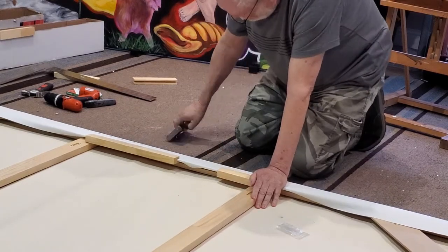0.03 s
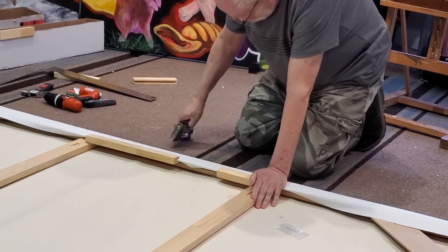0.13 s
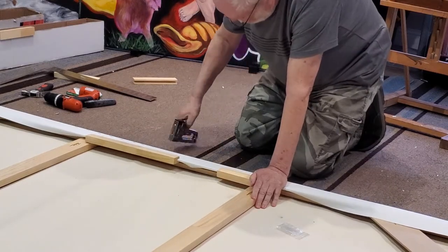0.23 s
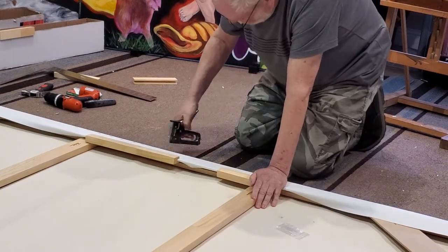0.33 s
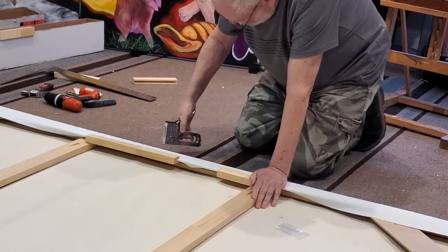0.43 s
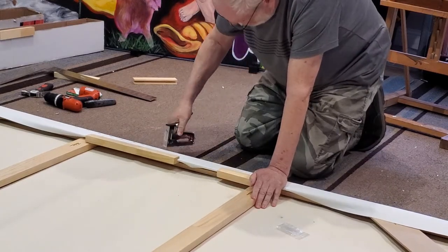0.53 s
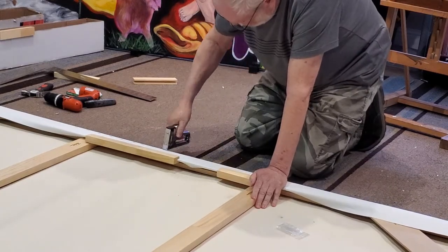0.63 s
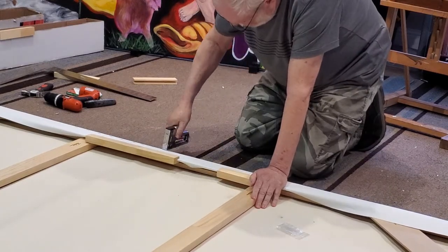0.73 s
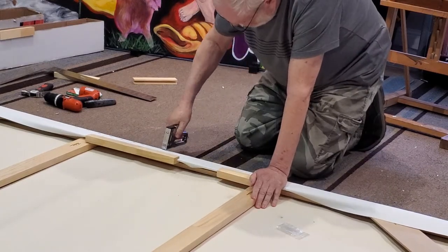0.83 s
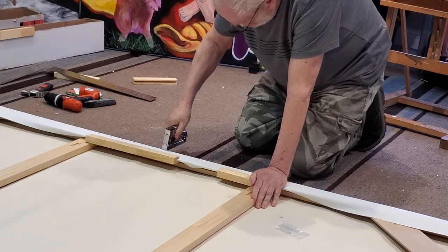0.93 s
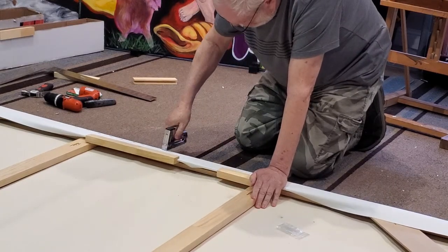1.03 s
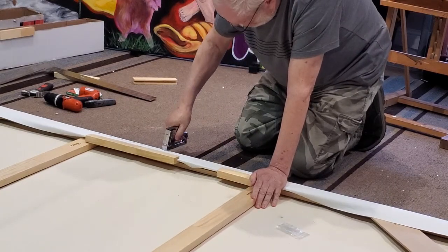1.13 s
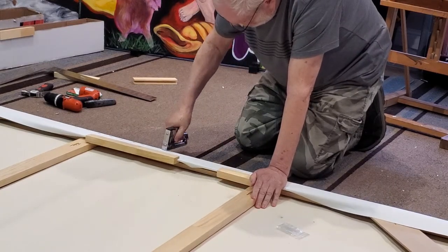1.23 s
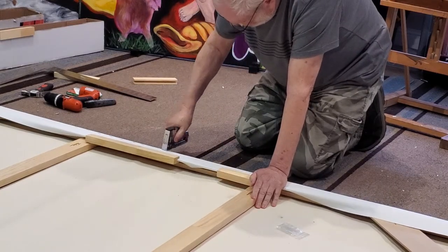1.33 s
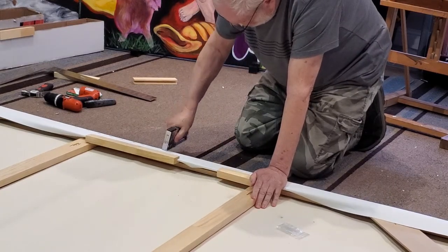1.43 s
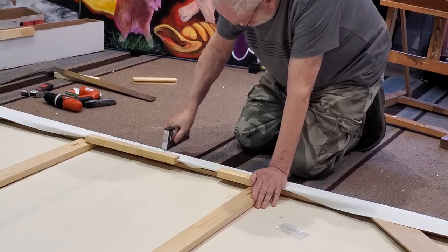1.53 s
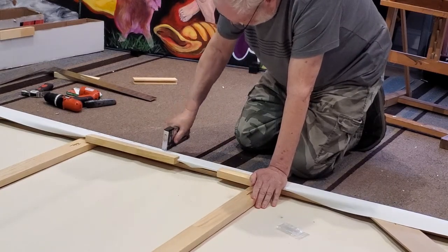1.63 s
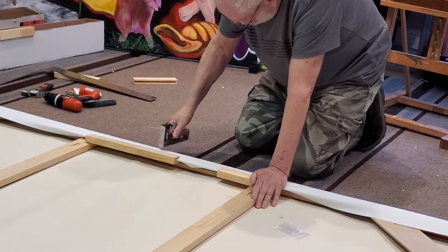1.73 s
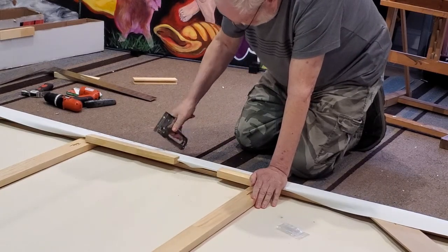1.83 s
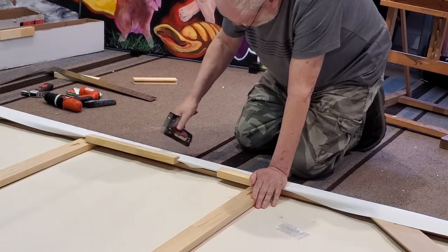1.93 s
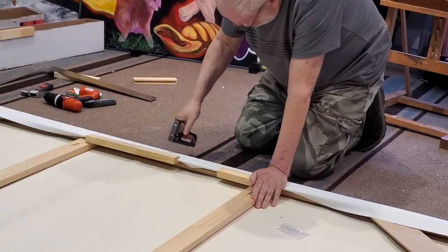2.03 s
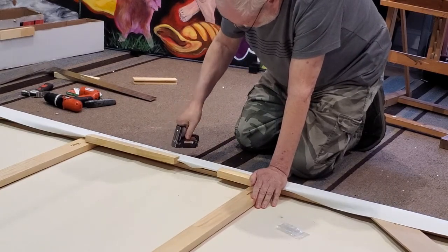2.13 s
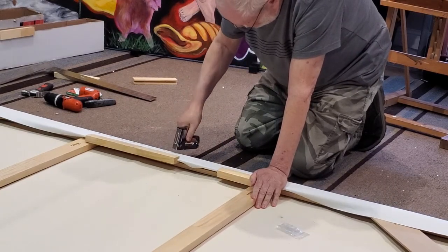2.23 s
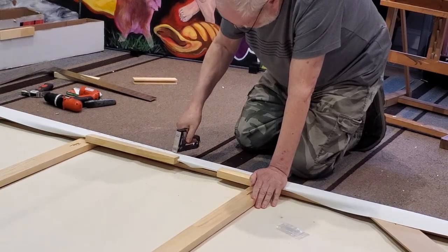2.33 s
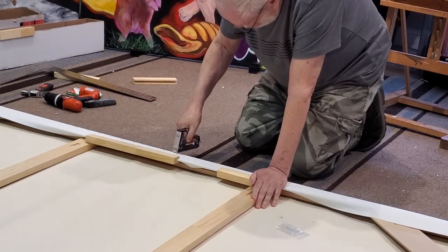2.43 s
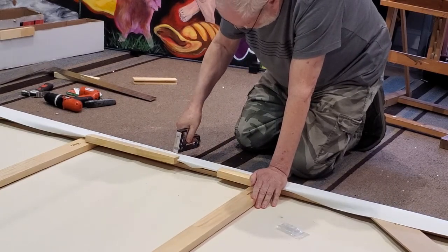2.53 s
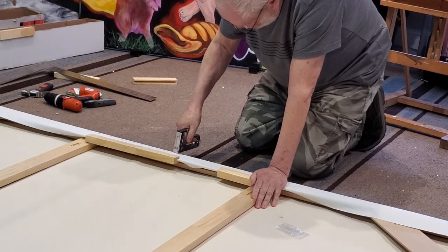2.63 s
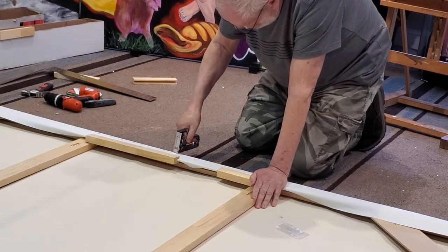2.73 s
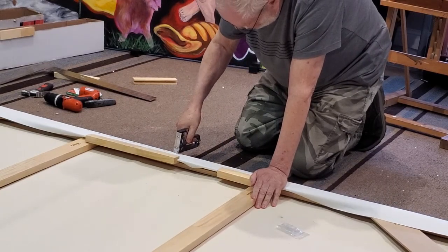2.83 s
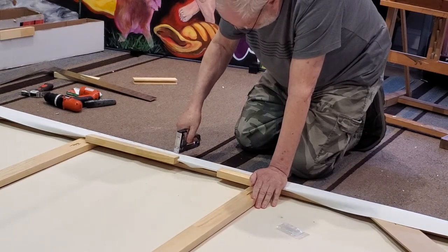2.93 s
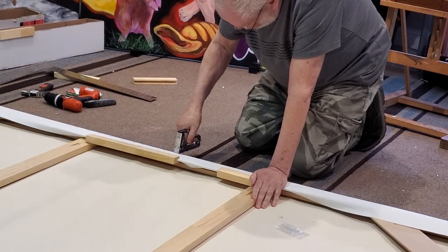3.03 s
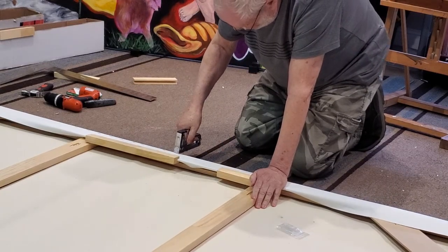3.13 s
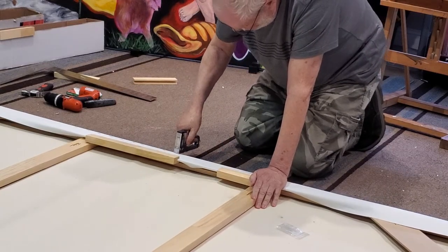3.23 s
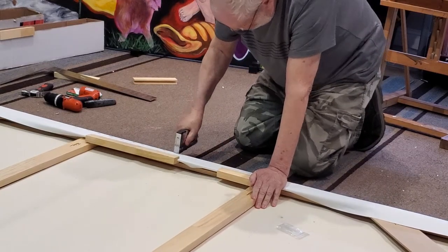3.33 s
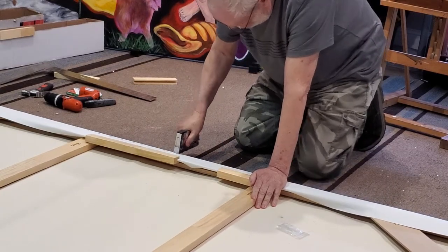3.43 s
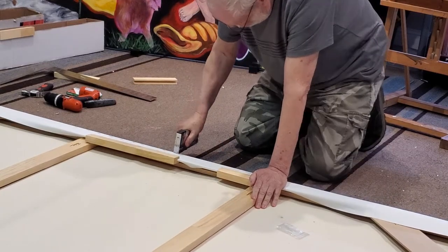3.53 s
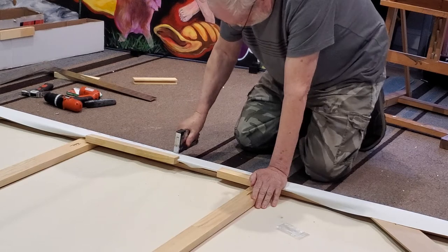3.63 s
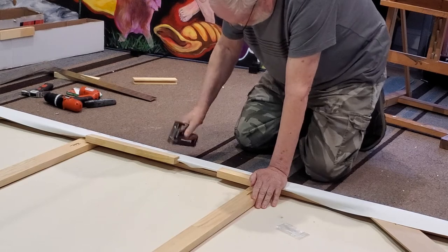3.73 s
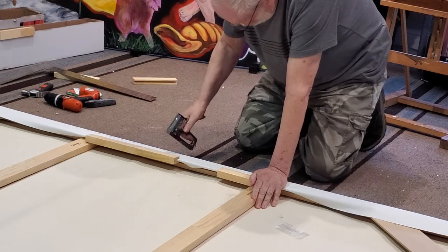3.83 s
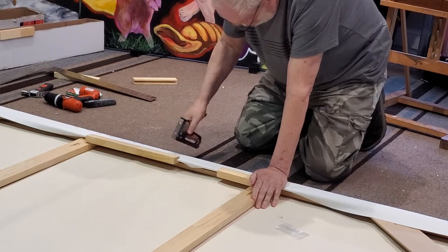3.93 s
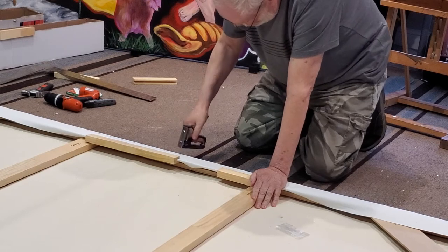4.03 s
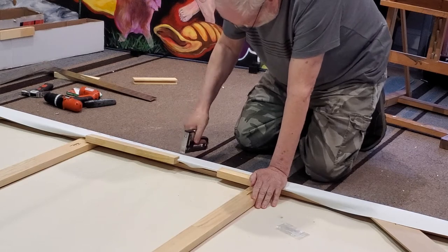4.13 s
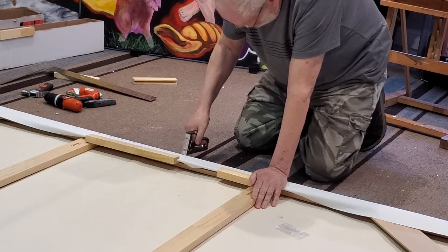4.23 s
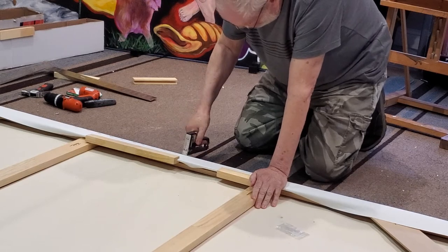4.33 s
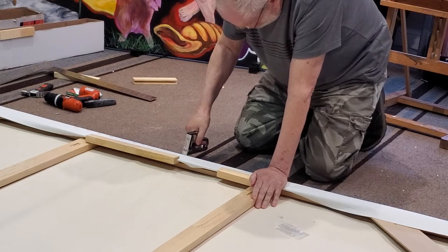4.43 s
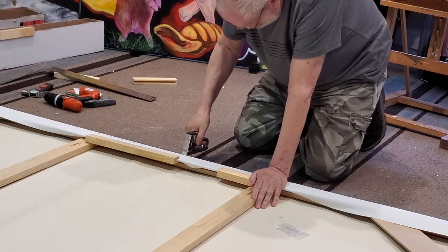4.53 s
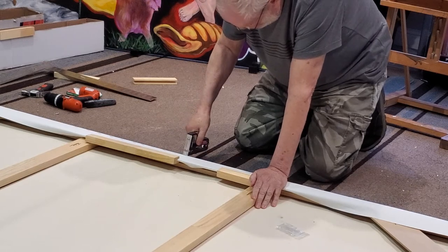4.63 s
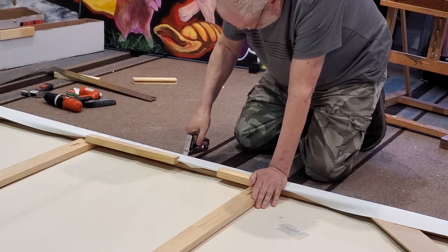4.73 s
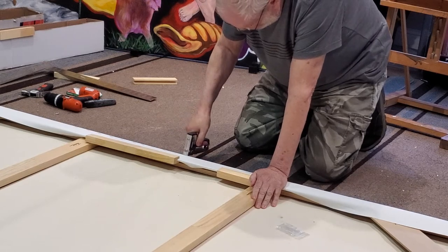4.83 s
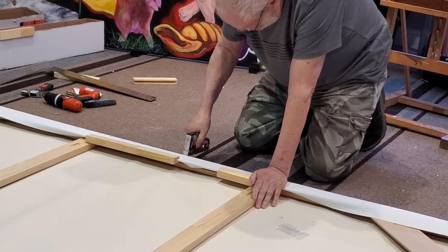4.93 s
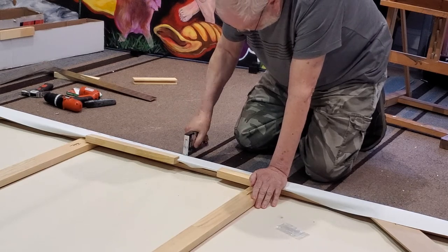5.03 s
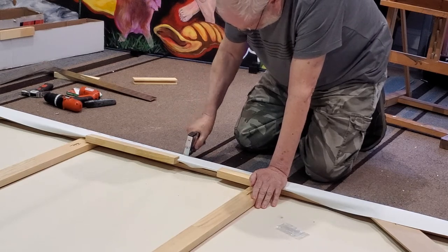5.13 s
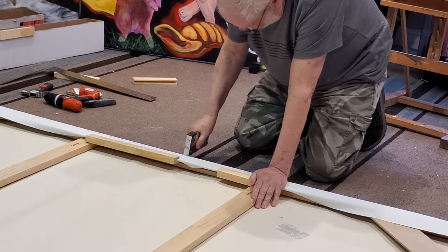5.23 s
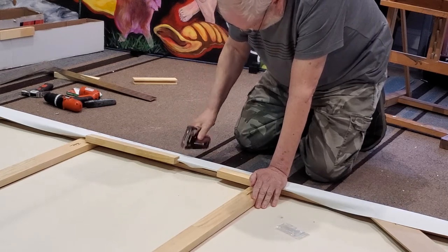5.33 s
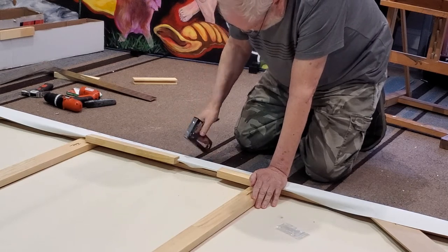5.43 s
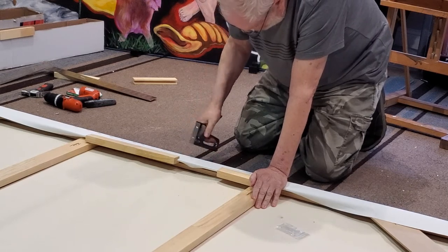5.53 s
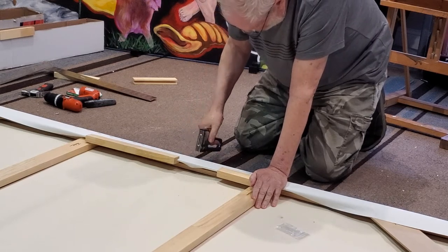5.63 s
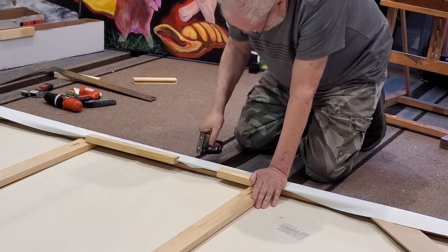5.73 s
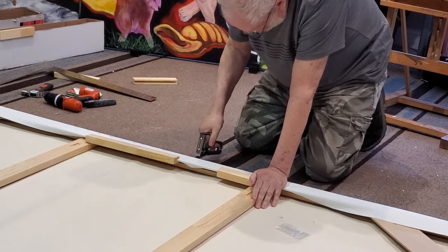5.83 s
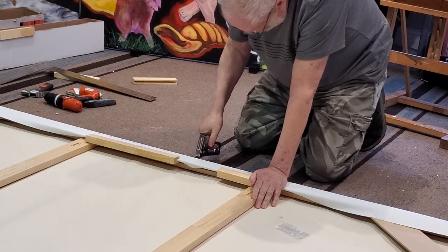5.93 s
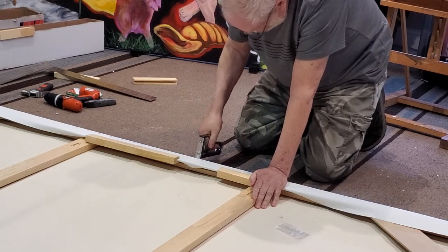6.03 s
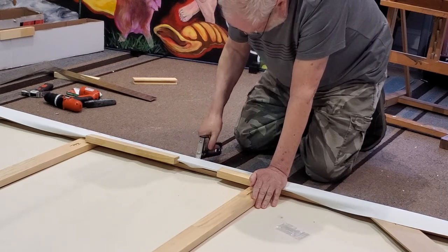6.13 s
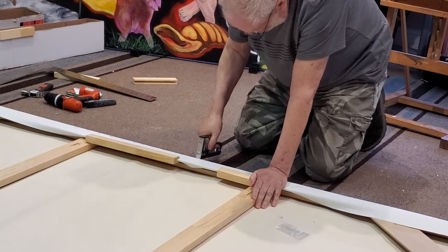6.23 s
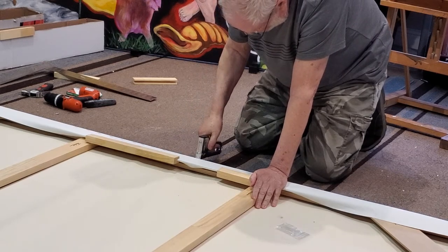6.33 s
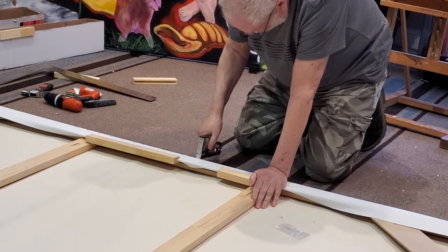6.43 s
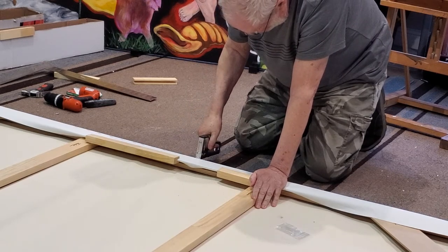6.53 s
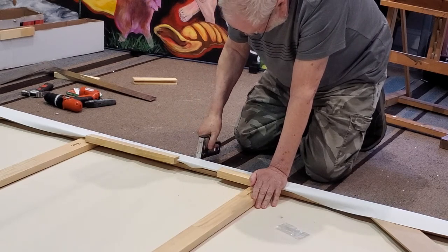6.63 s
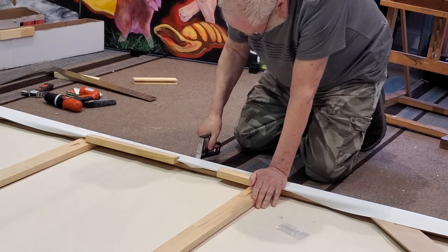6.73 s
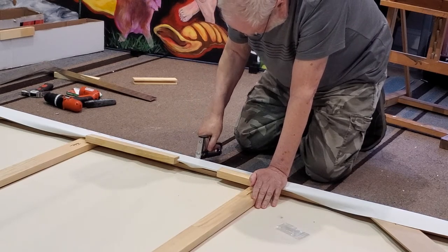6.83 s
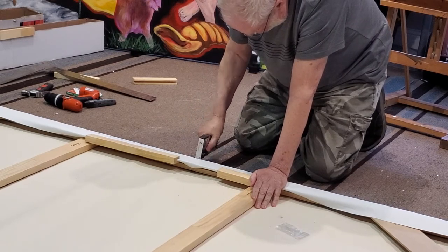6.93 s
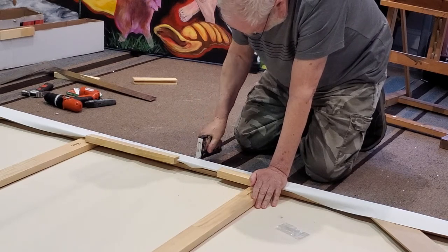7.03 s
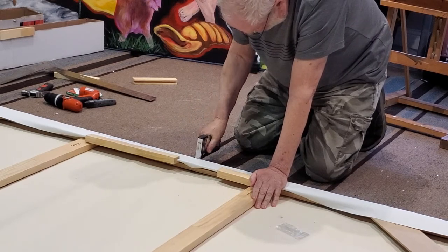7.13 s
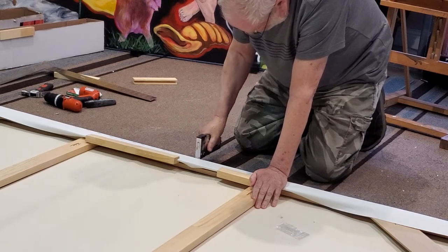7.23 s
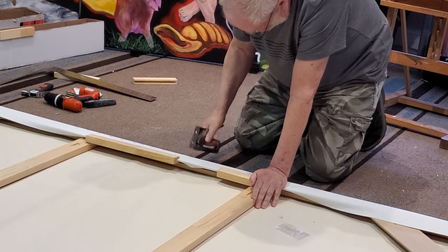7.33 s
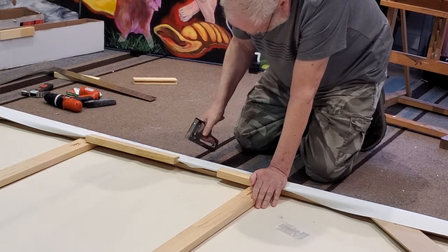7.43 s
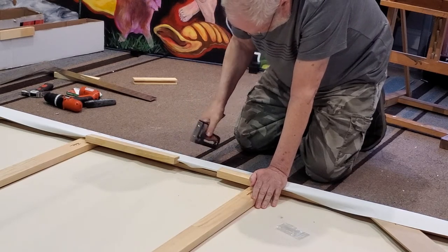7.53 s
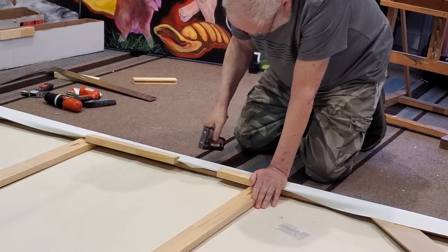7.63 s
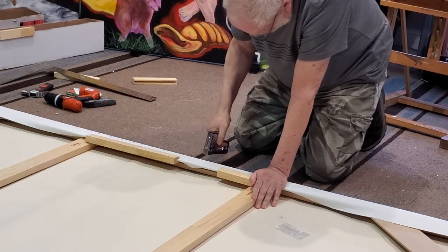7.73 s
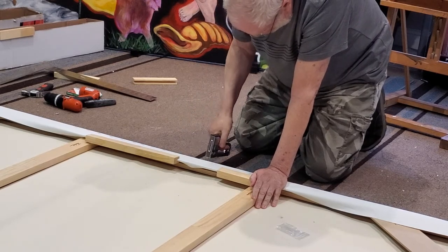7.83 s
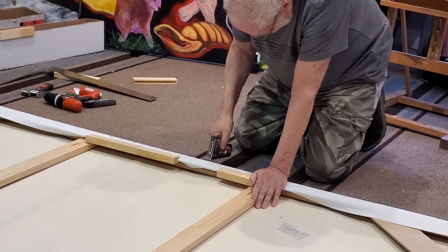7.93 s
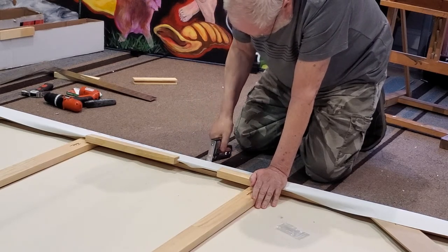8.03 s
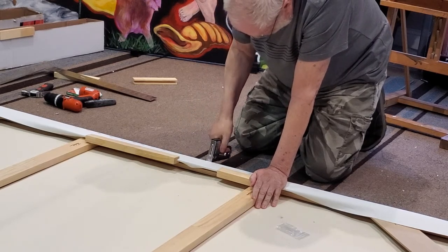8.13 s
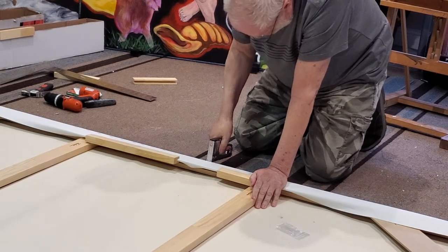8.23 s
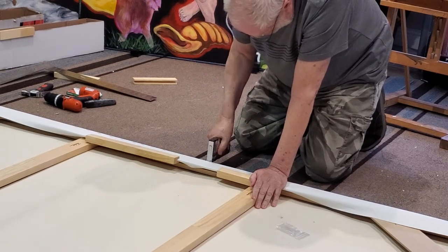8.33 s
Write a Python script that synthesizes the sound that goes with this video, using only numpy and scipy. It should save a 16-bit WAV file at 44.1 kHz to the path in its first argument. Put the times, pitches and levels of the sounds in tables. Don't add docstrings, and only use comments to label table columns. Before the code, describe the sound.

Four sharp staple-gun slams with woody thuds ring through a workshop, with creaking lever squeezes between them and a compressor humming deep behind.

```python
import sys
import numpy as np
from scipy import signal
from scipy.fft import rfft, irfft, next_fast_len
from scipy.io import wavfile
from scipy.ndimage import uniform_filter1d, map_coordinates

SR = 44100
rng = np.random.default_rng(int(sys.argv[2]) if len(sys.argv) > 2 else 0)


def natural_amplitude(level_db):
    exponent = np.asarray(level_db, float) / 20
    return 10 ** exponent


def store_pcm(level_fs):
    pcm = np.round(np.clip(level_fs, -1, 1) * 32767).astype(np.int16)
    wavfile.write(sys.argv[1], SR, np.atleast_2d(pcm).T)


N = 369999
CREST_S = .006

# start_s, peak_db, bar_thud_db, treble_db, low_mode_share_db
STAPLES = [
    (1.5623, -4, -13.5, -20, 1),
    (3.5086, -4.5, -14.5, -13, 3.5),
    (5.0995, -4.5, -17, -16, 1.5),
    (7.0894, -5, -12, -13, -4),
]
# centre_hz, width_hz, lift_db
NOSE_SPOTS = [
    [(1130, 110, 3), (3220, 150, 1.5), (4686, 380, 3)],
    [(1010, 65, 3), (1500, 87, 4), (3355, 1100, 3.5)],
    [(1036, 110, 6.5), (3302, 270, 2), (5295, 110, -7)],
    [(1620, 310, 9), (3670, 150, 6), (4744, 250, 5.5), (12000, 3500, 3)],
]
# freq_hz, density_db
SLAM_COLOUR = [(59, -44), (100, -17), (251, 7), (410, -9), (437, -9), (729, -17), (1030, -10), (1220, -13),
               (3250, -9.5), (5210, -14.5), (13300, -11), (15500, -13), (16500, -39.5)]
# centre_hz, width_hz, lift_db
CATCH_RING = (1600, 610, 6)
# centre_hz, width_hz, level_db
BAR_MODES = [(166, 9.7, -5.5), (196, 35, -0.5), (317.6, 28, -2.5), (439.5, 20, -13), (510, 13, -15),
             (650, 19, -10), (870, 74, -12)]

# start_s, peak_db, treble_db
LEVER_RETURNS = [
    (1.8278, -15.5, -5),
    (3.7969, -17, -5),
    (5.3849, -15.5, -5),
    (7.373, -15.5, -4.5),
]
# freq_hz, density_db
CLACK_COLOUR = [(180, -49.5), (300, -37), (513, -16), (907, -25), (1550, -1), (2210, -7.5), (3240, -2.5),
                (4030, -4), (9980, -5), (11600, -1), (15400, -2.5), (16500, -21.5)]
# centre_hz, width_hz, lift_db
STOP_RINGS = [(1526, 41, 6), (2343, 24, 7.5), (3145, 90, 6.5), (3486, 95, 6), (4720, 79, 4), (8805, 170, 2),
              (8960, 240, 4), (11550, 740, 3)]

# start_s, length_s, creak_db, squeak_over_creak_db, sag_db_per_s
LEVER_SLIPS = [(1.36, 0.17, -77.5, -15, 61), (3.31, .075, -73, -9, -59), (3.393, .105, -64, -5, 11),
               (4.926, .135, -64, -14, 60), (5.059, .028, -70, -15, 5), (6.79, 0.096, -67.5, -14, 150),
               (6.895, .058, -70.5, -1, -39), (6.944, .125, -62.5, 2, 129), (8.199, .07, -72, -13, 42),
               (8.278, .065, -68, -11, 89), (8.353, .05, -66.5, -14, 26.5)]
# freq_hz, density_db
CREAK_COLOUR = [(710, -34), (1200, -6.5), (1480, -4), (2000, -10.5), (2790, -12.5), (3750, -7.5),
                (4500, -9.5), (7500, -15), (11000, -10.5), (15100, -15), (16500, -30)]
# centre_hz, width_hz
LEVER_MODE = (1520, 60)
# centre_hz, width_hz
PIVOT_SQUEAK = (3780, 300)
# start_s, length_s, level_db
NOSE_RUBS = [
    (1.42, .06, -66),
    (1.522, .03, -71.5),
    (3.284, .18, -68),
    (3.467, .035, -61.5),
    (4.93, 0.093, -79.5),
    (5.064, .04, -57.5),
    (6.932, 0.055, -61),
    (7.056, .035, -62),
    (8.359, .04, -58),
]

# start_s, peak_db, ring_hz, treble_db
FLOOR_KNOCKS = [
    (.006, -63.5, 1970, 5.5),
    (0.068, -33, 1750, -13),
    (.070, -34.5, 3750, -5),
    (0.0888, -40.5, 3670, 8),
]
# start_s, peak_db, ring_hz
DULL_TAPS = [
    (.509, -61.5, 2000),
    (.740, -55.5, 2740),
    (.741, -64, 700),
    (.949, -61, 2970),
    (1.42, -69, 1500),
    (2.889, -71, 2050),
    (3.272, -70, 1140),
]
# start_s, peak_db, ring_hz
SLACK_CLICKS = [(1.069, -68, 5500), (1.359, -61, 10900), (3.139, -66, 1548), (3.309, -63.5, 2720),
                (3.387, -58.5, 9480), (4.918, -62.5, 1500), (4.927, -64, 4917), (6.783, -57, 1607),
                (6.785, -59, 8805), (6.889, -62, 3740), (6.948, -52, 10520), (8.199, -62.5, 4740),
                (8.289, -71.5, 3500), (8.345, -60, 9000)]
# start_s, peak_db
NOSE_LANDINGS = [
    (6.0576, -60.5),
    (8.022, -58.5),
]
# ring_hz, level_db
NOSE_RINGS = [(1200, -2), (2510, -1), (3500, -5)]
# ring_hz, level_db, t60_s
HOUSING_RINGS = [(700, -1.5, 1), (1220, -0.5, 0.86), (2200, 0, 0.66), (2930, 6.5, 0.38), (3100, -6, 0.96),
                 (3850, 0, 0.39)]
# start_s, level_db
FRAME_THUMPS = [
    (.0875, -38.5),
    (0.802, -87.5),
    (1.42, -59),
    (3.272, -49),
    (3.31, -57),
    (3.36, -59),
    (6.935, -58),
    (8.36, -60),
]

# freq_hz, t60_s
ROOM_DECAY = [(150, 0.44), (400, .52), (900, .55), (1550, 0.45), (2200, 0.46), (3300, 0.47), (6000, 0.47),
              (10000, 0.39), (15000, 0.36)]
# delay_s, level_db
NEAR_ECHOES = [(.0022, -5.5), (.0088, 2), (0.0122, -2), (.018, -1)]
# delay_s, level_db
FAR_ECHOES = [(.0085, -2.5), (.018, -5.5), (.045, -12.5), (.07, -4.5), (.135, -16)]
# freq_hz, likeness_0_to_1
PORT_LIKENESS = [(60, .96), (150, .975), (350, .965), (500, .75), (750, .25), (1200, .0), (12000, .0)]

# time_s, shaft_tone_peak_db
COMPRESSOR_LOAD = [(0, -41.5), (1.4, -44.5), (2.2, -49.5), (2.9, -52.5), (3.4, -49), (4.5, -56),
                   (5.6, -52.5), (6.4, -51), (7.1, -42), (7.7, -47), (8.39, -46)]
SHAFT_ORDERS = [-59.5, -68, -74.5]
# freq_hz, density_db
AIR_COLOUR = [(20, -12.5), (40, -0.5), (90, 0.5), (150, -7.5), (220, -10), (340, -19.5), (630, -32),
              (1100, -36.5), (2100, -35.5), (3500, -40), (7500, -50), (12000, -44), (16000, -47)]
# centre_hz, width_hz, lift_db
CASE_NOTE = (160, 12, 7)
# start_s, level_db
FLOOR_SHUDDERS = [
    (.07, -54),
    (1.561, -72),
    (3.51, -62),
    (5.098, -65.5),
    (7.09, -61.5),
]


def staples():
    out = np.zeros((2, N))
    for (s, db, thud_db, treble_db, low_db), spot in zip(STAPLES, NOSE_SPOTS):
        tick = causal(lambda hz: along(CLACK_COLOUR, hz) + lifts([CATCH_RING], hz))
        catch = workshop(lambda: burst(.0002, .003, spiky_db=3), NEAR_ECHOES, direct_db=4, wet_db=9,
                         build=.005, lasting=.6, size=SR // 4)
        add(out, s - .0125, natural_amplitude(db - 23) * tick, catch)

        ripple = uneven(depth_db=1.1, spacing_hz=170.14)
        low_cut = lambda hz: -10 * np.log10(1 + (480 / (hz + 1)) ** 6)
        modes = lambda hz: ripple(hz) + along(SLAM_COLOUR, hz) + lifts(spot, hz)
        steel = causal(lambda hz: modes(hz) + shelf(hz, 7800, treble_db + 8) + low_cut(hz))
        slam = workshop(lambda: burst(.0011, .003, spiky_db=1), NEAR_ECHOES, direct_db=4, wet_db=10,
                        build=.007, lasting=.95)
        add(out, s, natural_amplitude(db + 10.5) * steel, slam)

        wood = causal(lambda hz: frame(hz) + low_db / (1 + (hz / 260) ** 6), size=8192)
        boom = workshop(push, FAR_ECHOES, direct_db=0, wet_db=0, build=.022, lasting=1)
        add(out, s + .0015, natural_amplitude(db + thud_db + 21) * wood, boom)
    return out


def lever():
    out = np.zeros((2, N))
    for s, db, treble_db in LEVER_RETURNS:
        ripple = uneven(depth_db=.1, spacing_hz=199)
        modes = lambda hz: ripple(hz) + along(CLACK_COLOUR, hz) + lifts(STOP_RINGS, hz)
        steel = causal(lambda hz: modes(hz) + shelf(hz, 7000, treble_db + 5))
        clack = workshop(lambda: burst(.00025, .00088, spiky_db=.5), NEAR_ECHOES, direct_db=2, wet_db=10.5,
                         build=.0018, lasting=.88)
        add(out, s, natural_amplitude(db + 12) * steel, clack)
    return out


def squeeze():
    let_go_db_per_s = 501
    slip = lambda s, length, db, sag: swell(s, length, db, .006, sag, let_go_db_per_s)
    creak_gain = sum(slip(s, length, db, sag) for s, length, db, _, sag in LEVER_SLIPS)
    squeak_gain = sum(slip(s, length, db + over_db, sag) for s, length, db, over_db, sag in LEVER_SLIPS)
    rub_gain = sum(swell(*row, .013, 24.5, let_go_db_per_s) for row in NOSE_RUBS)

    slips = natural_amplitude(2.2 * wobble(110) + .6 * wobble(25))
    creak_colour = lambda hz: natural_amplitude(along(CREAK_COLOUR, hz) + lifts([(*LEVER_MODE, 4)], hz))
    creak = filtered(rng.standard_normal((2, N)), creak_colour)
    squeak = narrow(*PIVOT_SQUEAK)
    rub_colour = lambda hz: (hz / 400) ** 3 / (1 + (hz / 400) ** 3) / (1 + (hz / 750) ** 5)
    rub = filtered(ports(rng.standard_normal((2, N))), rub_colour)

    out = creak_gain * unit(slips * creak)
    out = out + rub_gain * unit(rub * natural_amplitude(1.6 * wobble(22)))
    return out + squeak_gain * natural_amplitude(-4.5) * unit(slips * squeak)


def handling():
    out = np.zeros((2, N))
    for s, db, ring_hz, thud_db, treble_db in contacts():
        ring = lambda hz: 1 / (1 + ((hz - ring_hz ** 2 / (hz + 1)) / (.22 * ring_hz)) ** 4)
        thud_band = lambda hz: (hz / 180) ** 4 / (1 + (hz / 180) ** 4) / (1 + (hz / 400) ** 6)
        fizz_band = lambda hz: 1 / (1 + (3500 / (hz + 1)) ** 4) / (1 + (hz / 12500) ** 6)
        thud = lambda hz: natural_amplitude(thud_db + 10.5) ** 2 * thud_band(hz)
        fizz = lambda hz: natural_amplitude(treble_db - 9) ** 2 * fizz_band(hz)
        power = lambda hz: ring(hz) * 2000 / ring_hz + thud(hz) + fizz(hz)
        loudness = np.sqrt(np.mean(power(np.arange(SR // 2))))
        colour = loudness * causal(lambda hz: 10 * np.log10(power(hz) + 1e-9))
        tick = workshop(lambda: burst(.0001, .0016, spiky_db=1), NEAR_ECHOES, direct_db=10, wet_db=13.5,
                        build=.008, lasting=.95, size=SR // 3)
        add(out, s, natural_amplitude(db + 19) * colour, tick)
    return out


def contacts():
    rows = [(s, db, hz, -16, treble_db) for s, db, hz, treble_db in FLOOR_KNOCKS]
    rows += [(*row, -11.5, -17) for row in DULL_TAPS]
    rows += [(*row, -8, 0) for row in SLACK_CLICKS]
    for s, db in NOSE_LANDINGS:
        rows += [(s, db + part_db, hz, -25, -19) for hz, part_db in NOSE_RINGS]
    return rows


def housing():
    t = np.arange(SR) / SR
    out = np.zeros((2, N))
    ring = sum(natural_amplitude(db - 60 * t / t60) * narrow(hz, width_hz=170, size=SR) for hz, db, t60 in HOUSING_RINGS)
    out[:, round(.07 * SR):][:, :SR] = natural_amplitude(-56) * ring * (1 - np.exp(-t / .027))
    return out


def thumps():
    out = np.zeros((2, N))
    soft = causal(lambda hz: frame(hz) - 10 * np.log10(1 + (hz / 430) ** 8), size=8192)
    for s, db in FRAME_THUMPS:
        boom = workshop(push, [], direct_db=5.6, wet_db=5.5, build=.027, lasting=.8, size=SR // 3)
        add(out, s, natural_amplitude(db + 20.5) * soft, boom)
    return out


def background():
    load_db = np.interp(np.arange(N) / SR, *np.transpose(COMPRESSOR_LOAD))
    t = np.arange(N) / SR
    hum = motors(load_db, t)
    whine = natural_amplitude(-100) * np.sin(2 * np.pi * 2062 * t) + natural_amplitude(-99) * np.sin(2 * np.pi * 1943 * t)
    level = natural_amplitude(-68 + .35 * (load_db + 47.5) - .5 * (t - 3) + .45 * wobble(5))
    level = level + sum(swell(s, .12, db, .025, 20, end_db_per_s=110.5) for s, db in FLOOR_SHUDDERS)
    duct = natural_amplitude(-16.5) * narrow(525, width_hz=23)
    return np.array([np.roll(hum, -5), hum]) + whine + level * (duct + natural_amplitude(8.5) * room_air())


def motors(load_db, t):
    shaft_hz, neighbour_hz, buzz_hz = 58.86, 57.29, 120
    turn = 2 * np.pi * shaft_hz * t + .091 * wobble(16)
    hum = natural_amplitude(load_db + .99 * wobble(3.1)) * np.sin(turn)
    neighbour_turns = shaft_hz * t + (neighbour_hz - shaft_hz) * (t - .1)
    buzz_turns = 2 * shaft_hz * t + (buzz_hz - 2 * shaft_hz) * (t - .052)
    hum += natural_amplitude(-60.5) * np.sin(2 * np.pi * neighbour_turns)
    for order, db in enumerate(SHAFT_ORDERS, 2):
        hum += natural_amplitude(db + 1.2 * wobble(2.2)) * np.sin(order * turn + 1.1)
    hum += natural_amplitude(-51.4 + .36 * wobble(9.1)) * np.sin(2 * np.pi * buzz_turns + .56)
    return hum


def room_air():
    z = signal.stft(rng.standard_normal((2, N)), nperseg=512)[2]
    patches = uniform_filter1d(rng.standard_normal(z.shape[1:]), size=6, axis=0)
    patches = uniform_filter1d(patches, size=14, axis=1)
    pair = signal.istft(z * natural_amplitude(.5 * unit(patches)), nperseg=512)[1][:, :N]
    return unit(filtered(ports(pair), lambda hz: natural_amplitude(along(AIR_COLOUR, hz) + lifts([CASE_NOTE], hz))))


def workshop(contact, echoes, direct_db, wet_db, build, lasting, size=SR * 3 // 5):
    hz, t, z = signal.stft(rng.standard_normal((2, size)), SR, nperseg=256)
    fade_db = -60 * t / (lasting * along(ROOM_DECAY, hz)[:, None]) - 18 * t ** 2
    tail = signal.istft(z * natural_amplitude(fade_db), SR, nperseg=256)[1]
    age = np.clip(np.arange(tail.shape[1]) / SR - .005, 0, 1)
    tail = ports(tail * (1 - np.exp(-(age / build) ** 2)))
    answer = natural_amplitude(wet_db) * tail / np.linalg.norm(tail[0])
    for late, db in [(.00029, direct_db)] + list(echoes):
        copy = contact()
        answer[:, round(late * SR):][:, :copy.shape[1]] += natural_amplitude(db) * copy
    return answer


def burst(rise, fall, spiky_db):
    t = np.arange(SR // 50) / SR
    shape = np.exp(-np.abs(t - CREST_S) / np.where(t < CREST_S, rise, fall))
    x = rng.standard_normal((2, len(t))) * natural_amplitude(spiky_db * rng.standard_normal(len(t))) * shape
    x = x / np.linalg.norm(x, axis=1)[:, None]
    x[[0, 1], round(CREST_S * SR) + rng.integers(-5, 6, 2)] += .5
    return x / np.linalg.norm(x, axis=1)[:, None]


def push():
    return np.tile(np.arange(SR // 50) == round(CREST_S * SR), (2, 1))


def add(track, s, colour, answer):
    sound = signal.fftconvolve(answer, colour[None], axes=1)
    start = max(round((s - CREST_S) * SR), 0)
    track[:, start:start + sound.shape[1]] += sound[:, :track.shape[1] - start]


def frame(hz):
    ring = 0
    for centre, width, db in BAR_MODES:
        damping = (hz * width) ** 2
        ring = ring + natural_amplitude(db) ** 2 * damping / ((centre * centre - hz * hz) ** 2 + damping)
    return 10 * np.log10(ring + 1e-12)


def uneven(depth_db, spacing_hz):
    knots = rng.standard_normal(200)
    return lambda hz: depth_db * map_coordinates(knots, [np.clip(hz / spacing_hz, 0, 199)])


def lifts(peaks, hz):
    return sum(db / (1 + (2 * (hz - c) / w) ** 2) for c, w, db in peaks)


def shelf(hz, corner_hz, db):
    return db * hz ** 2 / (hz ** 2 + corner_hz ** 2)


def swell(start, length, db, rise, sag_db_per_s, end_db_per_s):
    gain = np.zeros(N + SR)
    age = np.arange(SR * 3 // 4) / SR
    level_db = db - sag_db_per_s * age - end_db_per_s * np.clip(age - length, 0, 2)
    gain[round(start * SR):][:len(age)] = natural_amplitude(level_db) * (1 - np.exp(-age / rise))
    return gain[:N]


def wobble(rate):
    knots = rng.standard_normal(int(N * rate / SR) + 4)
    coarse = map_coordinates(knots, [np.arange(0, N + 32, 32) * rate / SR])
    return np.interp(np.arange(N) / 32, np.arange(len(coarse)), coarse)


def narrow(centre_hz, width_hz, size=N):
    band = lambda hz: 1 / (1 + (2 * (hz - centre_hz) / width_hz) ** 2)
    return unit(filtered(rng.standard_normal((2, size)), band))


def ports(pair):
    turn = lambda hz: np.arccos(np.clip(along(PORT_LIKENESS, hz), -1, 1)) / 2
    mid, side = filtered(pair, lambda hz: np.array([np.cos(turn(hz)), np.sin(turn(hz))]))
    return np.array([mid + side, mid - side])


def causal(db_of_hz, size=2048):
    cepstrum = irfft(np.log(natural_amplitude(db_of_hz(np.fft.rfftfreq(size, 1 / SR))) + 1e-6), size)
    cepstrum[1:size // 2] *= 2
    cepstrum[size // 2 + 1:] = 0
    pulse = irfft(np.exp(rfft(cepstrum)), size)
    return pulse / np.linalg.norm(pulse)


def filtered(x, response, size=8192):
    m = next_fast_len(x.shape[-1] + size)
    return irfft(rfft(x, m) * response(np.fft.rfftfreq(m, 1 / SR)), m)[..., :x.shape[-1]]


def along(points, hz):
    f, v = np.transpose(points)
    return np.interp(np.log(hz + 1), np.log(f + 1), v)


def unit(x):
    return x / np.sqrt(np.mean(x ** 2) + 1e-20)


def scene():
    gun = staples() + lever() + squeeze() + handling() + housing() + thumps()
    return gun * natural_amplitude([[-.7], [.7]]) + background() * natural_amplitude([[-.3], [.3]])


def top_cut(x):
    return signal.sosfilt(signal.butter(12, 16810, fs=SR, output="sos"), x)


def record(dry):
    x = filtered(dry, lambda hz: 1 / (1 + (hz / 16100) ** 60) / (1 + (24 / (hz + 1)) ** 4))
    x = x / (1 + np.abs(x / .93) ** 6) ** (1 / 6)
    return top_cut(x)


dry = scene()
out = record(dry)
store_pcm(out)
```